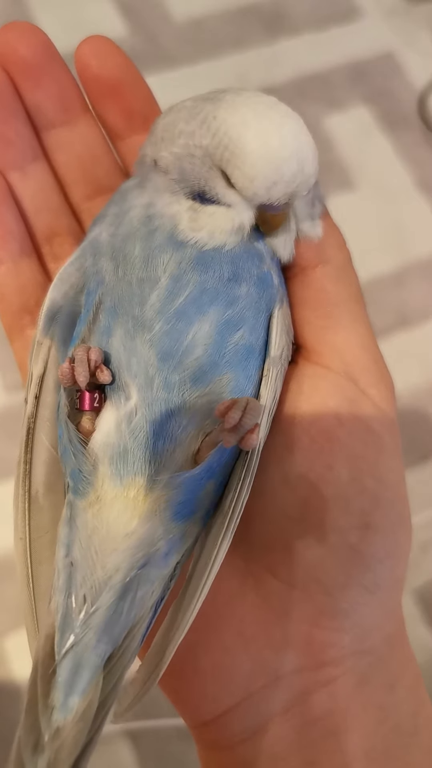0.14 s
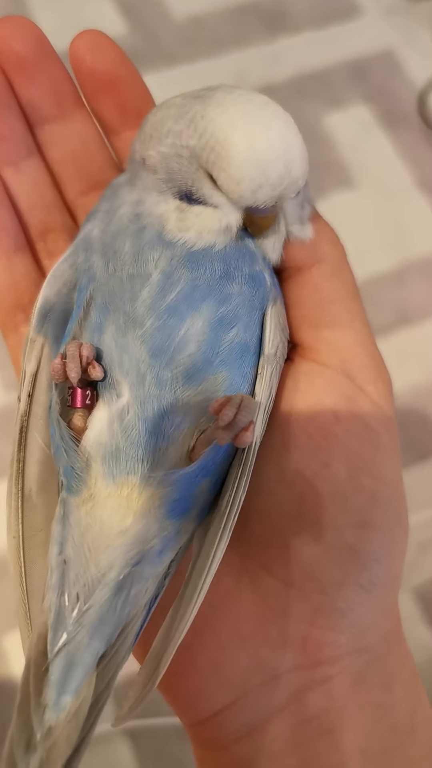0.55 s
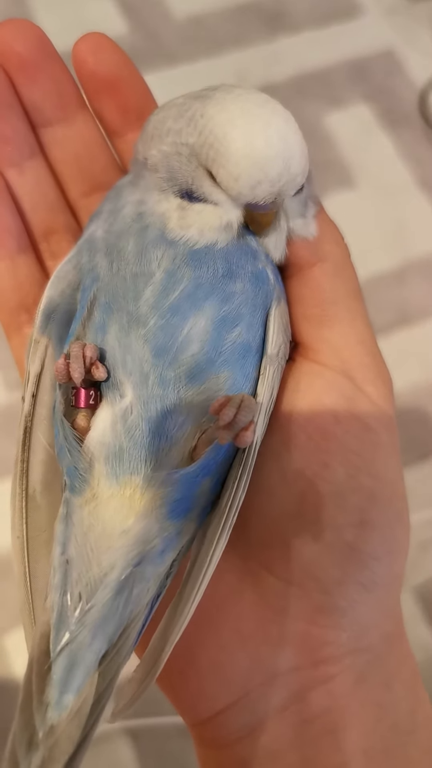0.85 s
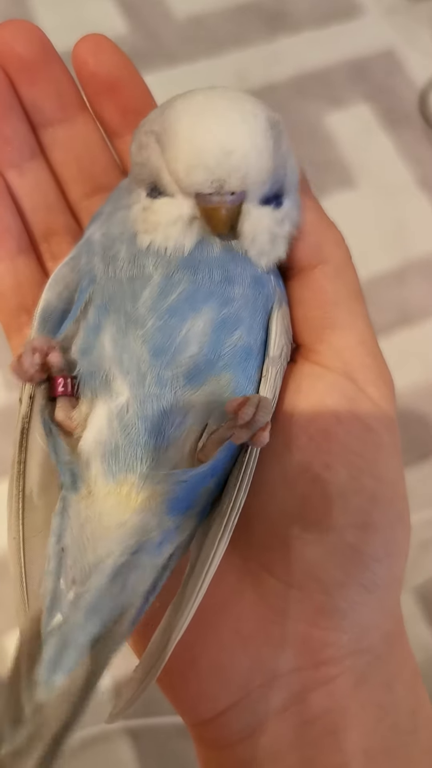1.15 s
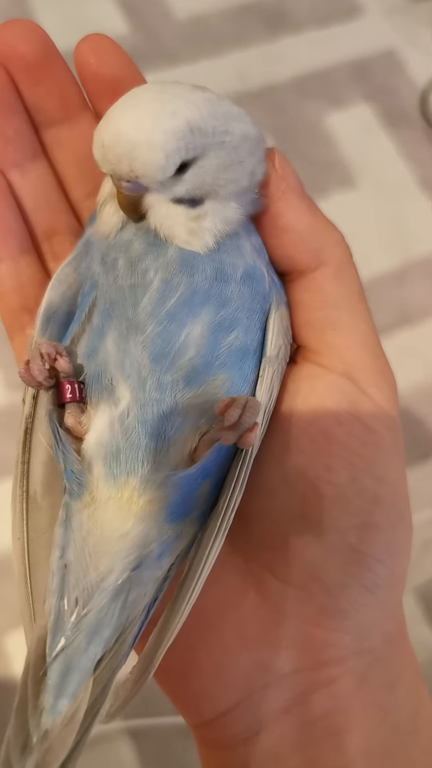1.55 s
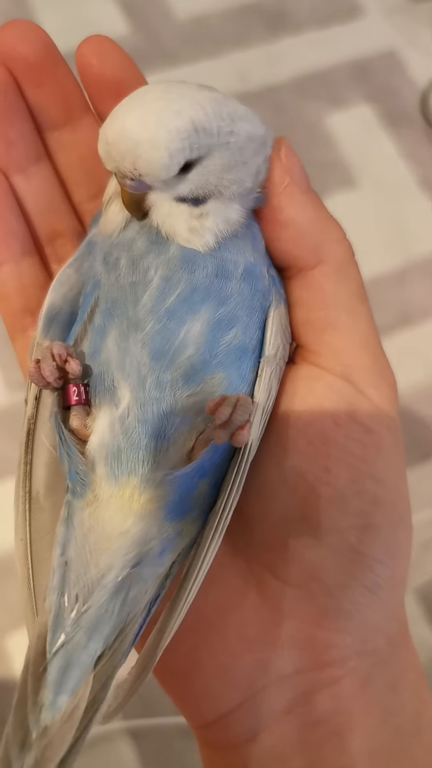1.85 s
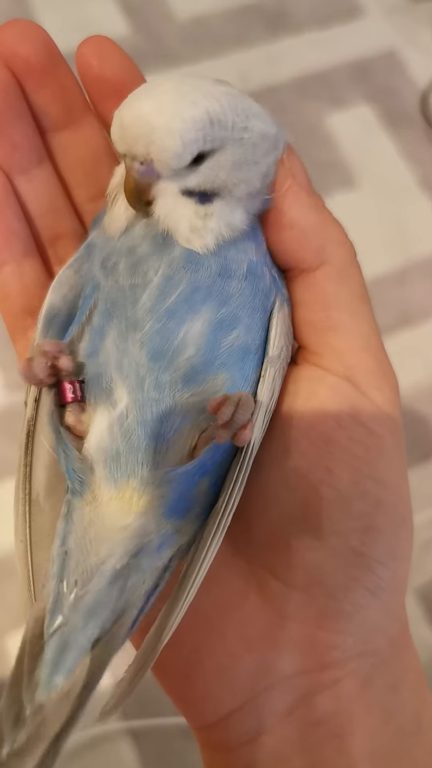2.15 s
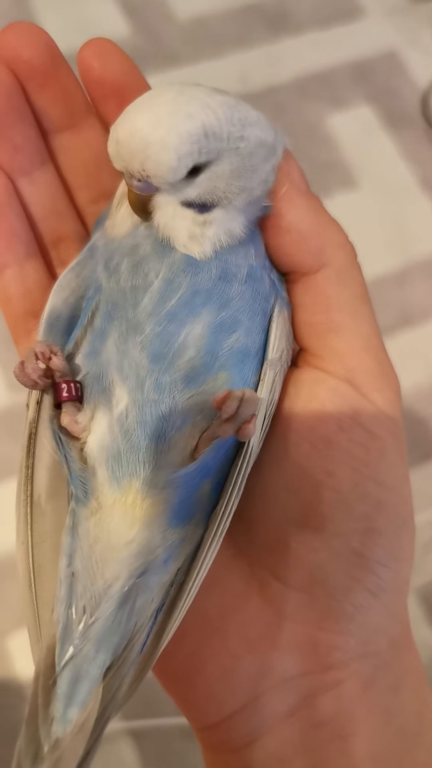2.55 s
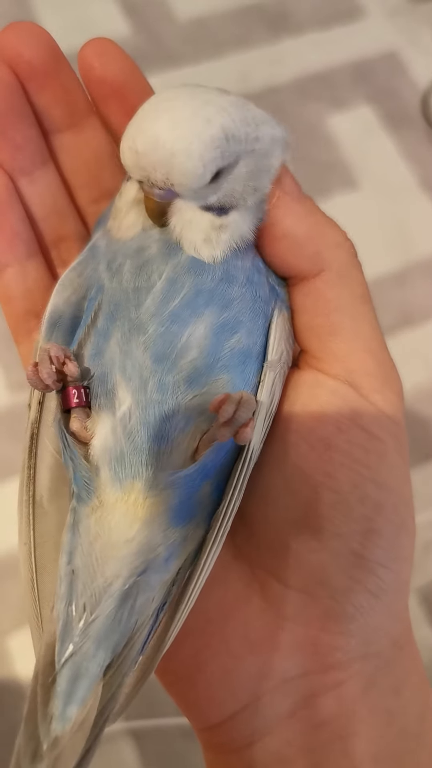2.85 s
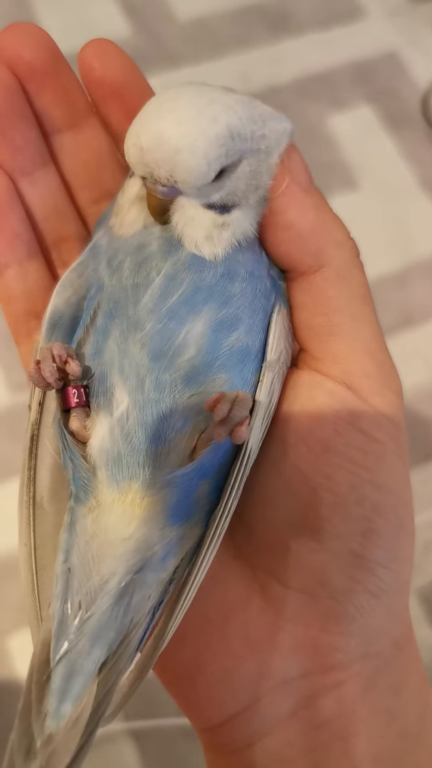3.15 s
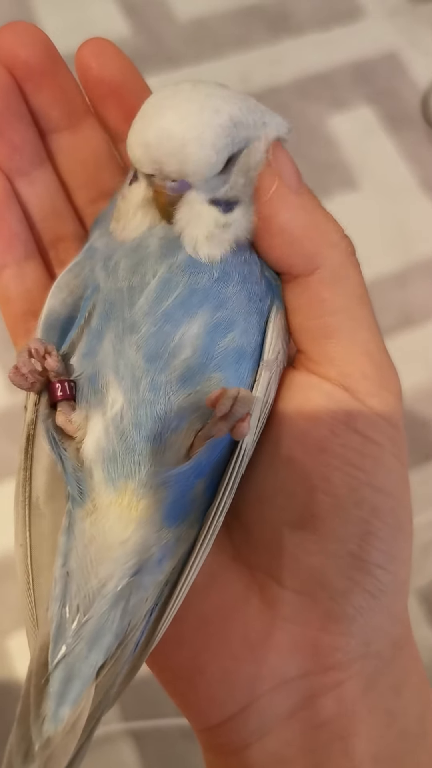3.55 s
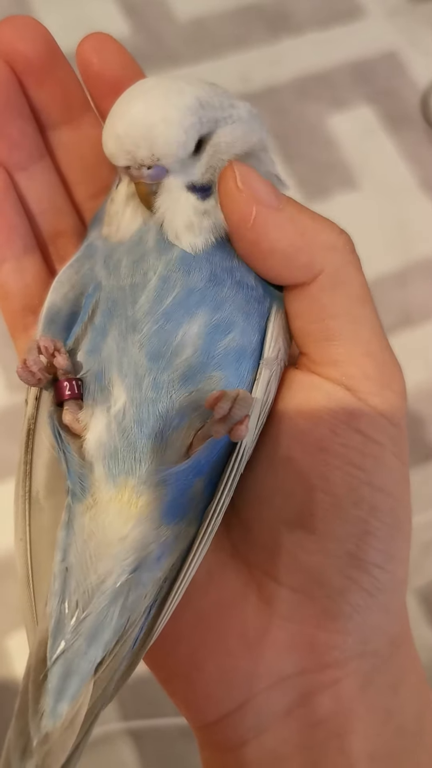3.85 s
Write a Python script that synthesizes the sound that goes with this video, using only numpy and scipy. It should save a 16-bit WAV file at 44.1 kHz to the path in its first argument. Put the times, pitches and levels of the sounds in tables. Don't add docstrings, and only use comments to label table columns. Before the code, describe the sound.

Budgie chirping three times, quick four-note whistles about a second apart, soft feather and skin rubbing between.

```python
import sys
import numpy as np
from scipy import signal
from scipy.fft import rfft, irfft
from scipy.io import wavfile
from scipy.ndimage import uniform_filter1d

SR = 44100
rng = np.random.default_rng(int(sys.argv[2]) if len(sys.argv) > 2 else 0)


def store_pcm(level_fs):
    pcm = np.round(np.clip(level_fs, -1, 1) * 32767).astype(np.int16)
    wavfile.write(sys.argv[1], SR, np.atleast_2d(pcm).T)


def nominal_scale(level):
    x = np.asarray(level, float) / 20
    return 10 ** x


N = 176400

# start_s, length_s, pitch_hz, level_db,
# break_db (level step before the note; for the first of four, onset overshoot in %)
CHIRP_NOTES = [(1.0777, .0275, 3549, -7.5, 21), (1.107, .028, 3068, -12.5, 3),
               (1.137, .044, 3339, -9.5, 1.5), (1.184, .0285, 2923, -12, -19),
               (2.2144, .027, 3622, -7.5, 1.5), (2.243, .030, 3130, -11, -0.5),
               (2.2766, .0455, 3366, -9.5, -17), (2.325, .035, 2961, -10, -22),
               (3.3365, .028, 3642, -7, 2.5), (3.367, .031, 3090, -11.5, -2), (3.4, .044, 3350, -9, -4),
               (3.446, .036, 2936, -10, -8)]
# frequency_hz, gain_db
PORT_GAIN = [(2300, -16.5), (2600, -6), (2900, -3), (3100, 0.3), (3400, 0.36), (7200, 3.5), (9000, -27),
             (12000, -59)]


def unit_rms(x):
    return x / np.sqrt(np.mean(x ** 2) + 1e-20)


def read(points, hz):
    f, v = np.transpose(points)
    return np.interp(np.log(hz + 1), np.log(f + 1), v)


def colour(x, gain):
    return irfft(rfft(x) * gain(np.fft.rfftfreq(N, 1 / SR)), N)


def ring(x, hz, width_hz):
    turn = np.exp(2j * np.pi * np.cumsum(hz * np.ones(len(x))) / SR)
    r = np.exp(-np.pi * width_hz / SR)
    baseband = signal.lfilter([(1 - r) ** 2], [1, -2 * r, r * r], x / turn)
    return 2 * (turn * baseband).real


def drift(size):
    once = uniform_filter1d(rng.standard_normal(N), size)
    return unit_rms(uniform_filter1d(once, size))


def lag(x, time_s):
    step = 1 / (time_s * SR)
    return signal.lfilter([step], [1, step - 1], x)


def right_port(x):
    # frequency_hz, lag_rad
    port_lag = [(2350, 2.2), (2930, 3.57), (3250, 5.2), (3650, 5.42), (4100, 5.34), (5900, 11),
                (6700, 12.2), (10900, 20.1)]
    return colour(x, lambda hz: nominal_scale(read(PORT_GAIN, hz)) * np.exp(-1j * read(port_lag, hz)))


def floor():
    # frequency_hz, density_db (per Hz)
    hum_curve = [(12, -39), (20, -5.5), (102, -2), (209, -10.5), (312, -6.5), (380, -9), (416, -8.5),
                 (447, -10), (1500, -24.5), (1950, -57), (3300, -120)]
    # frequency_hz, density_db (per Hz)
    hiss_curve = [(710, -30), (1200, -3.5), (2540, -8.5), (2750, -13), (3640, -15), (4900, -19),
                  (8250, -22), (10900, -22), (16200, -28)]
    # frequency_hz, width_hz, level_db
    fan_lines = [(45.954, 9.2, -67.5), (98, 6.3, -71.5), (303, 62, -74), (425, 27, -73.5), (479.6, 28, -76),
                 (933, 270, -80)]
    # frequency_hz, likeness (-1 to 1)
    coherence = [(60, 0.99), (180, 1), (550, 0.44), (1650, -0.02), (4970, 0.89), (15000, -0.72)]
    # frequency_hz, left_minus_right_db
    imbalance = [(60, -2.5), (150, -3), (380, -1.5), (950, 4.5), (2380, 4.0), (5980, -0.5), (11000, 15.5)]
    hum_db, hiss_db, split_hz = -57.5, -71.5, 1400

    def same(f):
        return np.clip(read(coherence, f), -1, 1)

    a, b = rng.standard_normal((2, N))
    partner = colour(a, same) + colour(b, lambda f: np.sqrt(1 - same(f) ** 2))
    pair = np.array([a, partner])
    hum = colour(pair, lambda f: nominal_scale(read(hum_curve, f)) * (f < split_hz) * (f > 18))
    hiss = colour(pair, lambda f: nominal_scale(read(hiss_curve, f)) * (f >= split_hz))
    mix = nominal_scale(hum_db + 0.39 * drift(size=6000)) * unit_rms(hum)
    mix += nominal_scale(hiss_db) * unit_rms(hiss)
    for hz, width_hz, db in fan_lines:
        mix += nominal_scale(db) * unit_rms(ring(a, hz, width_hz))
    left = colour(mix[0], lambda f: nominal_scale(read(imbalance, f) / 2))
    right = colour(mix[1], lambda f: nominal_scale(-read(imbalance, f) / 2))
    return np.array([left, right])


def whine():
    # frequency_hz, width_hz, level_db
    whine_bands = [(8620, 130, -80.5), (9460, 150, -84.5), (10870, 500, -81), (14850, 150, -90)]
    ticks_per_s, first_tick_s = 30, .028
    place = (np.arange(N) / SR - first_tick_s) * ticks_per_s % 1
    gate = .3 + np.exp(-((place - .4) / 0.042) ** 2) + np.exp(-((place - .63) / .06) ** 2)
    x = np.zeros(N)
    for hz, width_hz, db in whine_bands:
        pulse = gate if width_hz < 300 else .6 + .3 * gate
        x += nominal_scale(db) * pulse * unit_rms(ring(rng.standard_normal(N), hz, width_hz))
    return np.array([2 * x, 0 * x])


def room(x):
    # frequency_hz, t60_s
    decay = [(2000, .6), (3300, 0.63), (3900, .5), (6500, 0.6), (12000, 0.32)]
    # delay_s, level_db
    reflections = [(.0031, -22.5), (.0078, -29), (0.0135, -27.5), (.019, -28)]
    tail_db, tilt_db_per_octave, build_s, sway_rad = -23, 0.86, 0.015, 0.73
    taps = np.zeros((4, SR))
    at = np.arange(300, SR - 20, 20) + rng.integers(0, 20, (4, (SR - 301) // 20))
    np.put_along_axis(taps, at, rng.choice([-1., 1.], at.shape), 1)

    hz, t, z = signal.stft(taps, SR, nperseg=256)
    decay_db = -60 * t / read(decay, hz)[:, None]
    tilt_db = tilt_db_per_octave * np.log2(hz[:, None] / 3000 + .1)
    z *= np.tanh(t / build_s) * nominal_scale(decay_db + tilt_db)
    tail = signal.istft(z, SR, nperseg=256)[1]
    tail *= nominal_scale(tail_db) / np.linalg.norm(tail[0])
    for delay_s, db in reflections:
        tail[0, round(delay_s * SR)] += nominal_scale(db)
        tail[1, round(delay_s * SR * 1.1)] += nominal_scale(db)

    wet = signal.fftconvolve(x[None], tail, axes=1)[:, :N]
    sway = sway_rad * drift(size=2500)
    wet = np.cos(sway) * wet[:2] + np.sin(sway) * wet[2:]
    right = colour(wet[1], lambda f: nominal_scale(np.minimum(read(PORT_GAIN, np.maximum(f, 3400)), 0)))
    return np.array([wet[0], right])


def strokes():
    # start_s, length_s, from_hz, to_hz, level_db
    rubs = [(.08, .25, 2250, 3200, -77.5), (.33, 0.34, 2380, 2300, -73.5), (0.227, 0.47, 3800, 3340, -72.5),
            (.74, 0.44, 3450, 3660, -75), (0.795, 0.44, 2376, 2261, -76.5),
            (1.628, 0.36, 3100, 2920, -63.5), (1.705, 0.33, 3990, 4250, -69), (1.832, .22, 2720, 2470, -61),
            (2.035, .12, 2320, 2353, -66.5), (2.586, 0.33, 4050, 3710, -57), (2.59, 0.4, 3410, 3275, -59),
            (2.83, 0.26, 3230, 2720, -65.5), (3.501, 0.33, 4130, 3835, -63),
            (3.558, 0.23, 3380, 3000, -53.5)]
    width_hz, grit_db, sag, ease = 800, 0.5, 0.051, 0.83
    high_hz, high_db = 7046, -18
    out = np.zeros((2, N))
    grit = rng.standard_normal((2, N)) * nominal_scale(grit_db * drift(size=250))
    for start_s, length_s, from_hz, to_hz, db in rubs:
        i = round(start_s * SR)
        u = np.arange(0, 1, 1 / (length_s * SR))
        span = slice(i, i + len(u))
        press = np.sin(np.pi * u ** 0.64)
        hz = (from_hz + (to_hz - from_hz) * u) * (1 - sag * (1 - press))
        for port in range(2):
            grains = grit[port, span]
            band = unit_rms(ring(ring(grains, hz, width_hz), hz, width_hz))
            band += port * nominal_scale(high_db) * unit_rms(ring(grains, high_hz, 2 * width_hz))
            out[port, span] += nominal_scale(db) * press ** ease * band
    return out * nominal_scale([[2.5], [-.5]])


def brushes():
    # start_s, length_s, level_db, dullness_db
    swishes = [
        (0.231, 0.056, -73, 0),
        (0.308, 0.12, -72.5, 1),
        (1.7, .2, -80.5, 4),
        (1.88, 0.12, -64.5, 6),
        (2.018, 0.11, -59, -1.5),
        (2.07, .13, -67, 3),
        (2.591, .11, -71.5, 3),
        (2.685, 0.13, -70.5, 1.5),
        (2.8, .2, -81.5, 6),
        (3.585, 0.17, -66.5, 7.5),
    ]
    # frequency_hz, density_db (per Hz)
    feather_curve = [(1800, -10), (4300, -4.5), (6200, -12), (7600, -3.5), (9300, 5), (12000, 4),
                     (14000, -13.5), (15500, -3.5)]
    # frequency_hz, width_hz, level_db
    barbs = [(9020, 860, -5.5), (12400, 400, -15), (6100, 700, -21)]
    t = np.arange(N) / SR
    level, sheen = np.zeros(N), np.zeros(N)
    for start_s, length_s, db, dull_db in swishes:
        u = np.clip((t - start_s) / length_s, 0, 1)
        swell = nominal_scale(db) * abs(np.sin(np.pi * u ** .6)) ** 1.6
        level += swell
        sheen += swell * nominal_scale(-dull_db)

    noise = colour(rng.standard_normal(N), lambda f: nominal_scale(read(feather_curve, f)) * (f > 1500))
    x = nominal_scale(1.4 * drift(size=500)) * unit_rms(noise)
    for hz, width_hz, db in barbs:
        x += nominal_scale(db + 4.4 * drift(size=900)) * unit_rms(ring(rng.standard_normal(N), hz, width_hz))
    top = colour(x, lambda f: 1 / (1 + (10800 / (f + 1)) ** 16))
    x = level * (x - top) + sheen * top
    return np.array([1.9 * x, 1.7 * right_port(x)])


def beak():
    click_s = [.813, 1.0644, 2.199, 2.92, 3.3215]
    # level_db, one for each tick
    click_db = [-64, -51, -52, -59, -55]
    pop_hz, pop_db, puff_db = 2300, -38, -46
    clicks = np.zeros(N)
    clicks[np.round(np.array(click_s) * SR).astype(int)] = nominal_scale(click_db)
    pop = np.zeros(N)
    pop[[round(note[0] * SR) + 40 for note in CHIRP_NOTES[::4]]] = nominal_scale(pop_db) * 20
    breath = unit_rms(ring(rng.standard_normal(N), 7500, 7000))
    puff = nominal_scale(puff_db) * breath * np.convolve(pop > 0, np.hanning(220))[40:N + 40]
    return puff + ring(pop, pop_hz, 500) + 2.5 * ring(clicks, 4200, 2000) + 2.5 * ring(clicks, 10500, 4000)


def whistle_course():
    # share of the note (0-1), pitch ratio, level_db
    hook = [(0, 1.1, -26), (.06, 1.07, -22), (.16, 1.035, -22.5), (.33, 1.015, -14), (.52, 1.005, -3),
            (.75, 1.001, -1.5), (.93, 0.98, -3), (1, .96, -5)]
    step = [(0, 1.05, 0.5), (.3, 1.015, 0.5), (.52, .975, 2), (.63, .945, 4), (.75, .85, 2), (1, 0.8, -1.5)]
    flat = [(0, .98, -2), (.09, .97, -2.5), (.16, .99, 0.5), (.6, 1.002, -1.05), (.92, 1.008, -2.5),
            (1, 1.036, -4)]
    fall = [(0, 1.03, -4.5), (.2, 1.005, -0.5), (.52, .99, 0.5), (.66, .92, -1.5), (.8, .83, -5),
            (.9, .79, -11), (1, 0.77, -21)]
    # start_bend_%, end_bend_%, end_swell_db, brightness_db
    accents = [(-1.5, 0.2, 0, 1), (0.06, -2, -3.5, 2.5), (-6, -1.05, 0.2, -1), (-1, 5, -4, 2),
               (1, 0.25, -.5, -2), (-0.03, 1.5, .5, -6), (-5, -0.3, 0, .5), (0.4, 0.03, 1, -3.5),
               (2.5, 0.3, .8, -1), (1, 2.5, 1.5, -3.5), (0.75, 0.52, -.5, 2), (1.5, 0, 1.5, -2.5)]
    onset_share, scoop_dull_db = 0.085, -11
    knots = []  # time_s, pitch_hz, level_db, brightness_db
    for i, (note, accent) in enumerate(zip(CHIRP_NOTES, accents)):
        start_s, length_s, pitch_hz, note_db, break_db = note
        bend_in, bend_out, swell_db, bright_db = accent
        place = i % 4
        first, held, last = place == 0, place == 2, place == 3
        points = []
        for u, ratio, rel_db in (hook, step, flat, fall)[place]:
            early = (u < .12) if held else (1 - u) ** 2
            ratio = ratio + (bend_in * early + bend_out * u ** 2) / 100
            points.append((u, ratio, rel_db + swell_db * u ** 2))

        entry_hz = pitch_hz * points[0][1]
        if first:
            knots.append((start_s - .0008, entry_hz * (1 + break_db / 100), -120, bright_db))
        else:
            end_s, end_hz, end_db, _ = knots[-1]
            knots.append(((end_s + start_s) / 2, (end_hz + entry_hz) / 2, end_db + break_db, bright_db))
        for u, ratio, rel_db in points:
            overshoot = first * break_db / 100 * np.exp(-(u / onset_share) ** 2)
            dull_db = scoop_dull_db * held * (u < .12)
            knots.append((start_s + u * length_s, pitch_hz * ratio * (1 + overshoot),
                          note_db + rel_db, bright_db + dull_db))
        if last:
            knots.append((start_s + length_s + .004, knots[-1][1], -120, bright_db))
    return np.array(sorted(knots)).T


def chirps():
    harmonics_db = [0, -23, -23.5, -35, -43]
    # frequency_hz, gain_db
    throat = [(4400, 0.5), (5300, 6), (6100, -10), (6800, 2), (7600, -5), (9300, 9), (11500, -3),
              (14500, -2)]
    # frequency_hz, density_db (per Hz)
    haze_curve = [(900, -19), (3300, -13), (4500, -1), (6000, -3), (8500, 1.5), (11600, -6), (12800, -20),
                  (15000, -3)]
    haze_db, haze_patch_db, flutter_db, wobble = -31, 4, .35, .004
    soft_bright, squeezed_hz = .5, 3750
    knot_s, knot_hz, knot_db, knot_bright_db = whistle_course()
    t = np.arange(N) / SR
    hz = np.interp(t, knot_s, knot_hz) * (1 + wobble * drift(size=50))
    phase = 2 * np.pi * np.cumsum(hz) / SR
    level_db = np.interp(t, knot_s, knot_db)
    bright_db = np.interp(t, knot_s, knot_bright_db)
    squeeze = np.clip((hz - squeezed_hz) / 200, 0, 1)
    soft_db = soft_bright * np.clip(-14.5 - level_db, 0, 20) * squeeze

    tone = np.zeros(N)
    for k, harmonic_db in enumerate(harmonics_db, 1):
        octave_db = (k == 2) * (soft_db + bright_db)
        gain_db = harmonic_db + octave_db + read(throat, k * hz) + flutter_db * k * drift(size=60)
        tone += nominal_scale(gain_db) * np.sin(k * phase) * (k * hz < 19000)

    haze = np.zeros(N)
    for band in range(8):
        patch = nominal_scale(haze_patch_db * drift(size=400))
        haze += patch * colour(rng.standard_normal(N),
                              lambda f: (f // 2000 == band) * (f > 800) * nominal_scale(read(haze_curve, f)))
    return nominal_scale(level_db) * (np.sqrt(2) * tone + nominal_scale(haze_db + soft_db) * unit_rms(haze))


def scene():
    bird = chirps() + beak()
    loud = np.clip(uniform_filter1d(abs(bird), 800) * 10, 0, 1)
    pump_db = -11 * lag(loud, .05) + 8.5 * lag(loud, 0.56)
    direct = np.array([bird, right_port(bird)])
    return direct + room(bird) + strokes() + brushes() + floor() * nominal_scale(pump_db) + whine()


def band_limit(x):
    return signal.sosfilt(signal.butter(12, 16470, fs=SR, output="sos"), x)


def record(dry):
    narrow = colour(dry, lambda f: f < 15850)
    return band_limit(narrow)


dry = scene()
out = record(dry)
store_pcm(out)
```